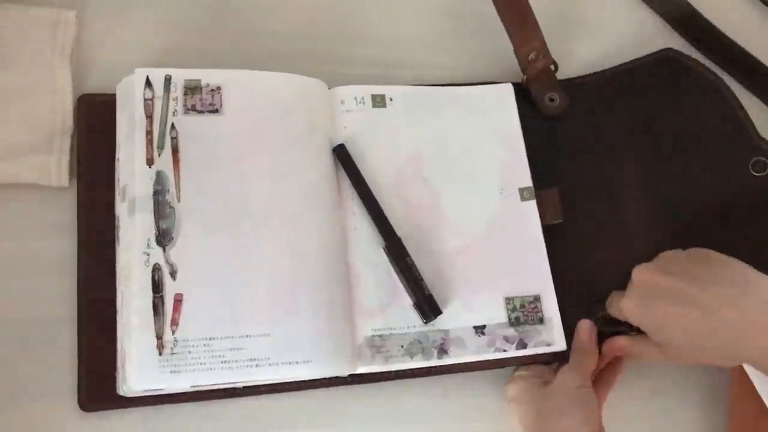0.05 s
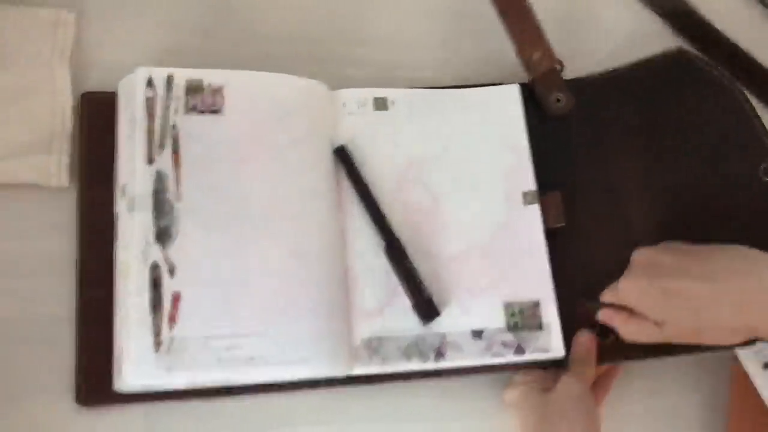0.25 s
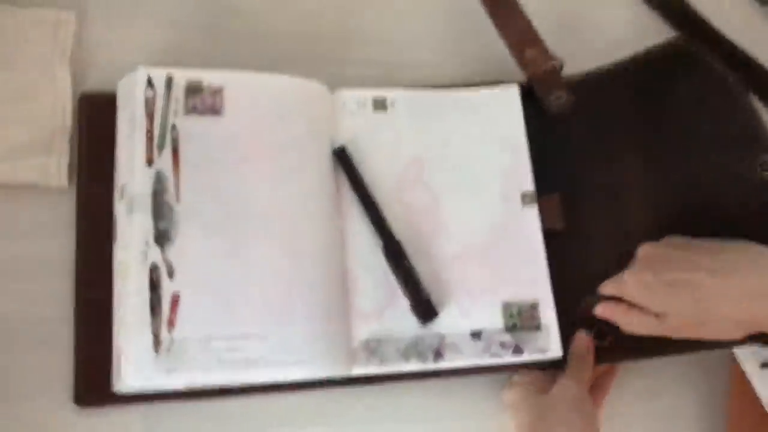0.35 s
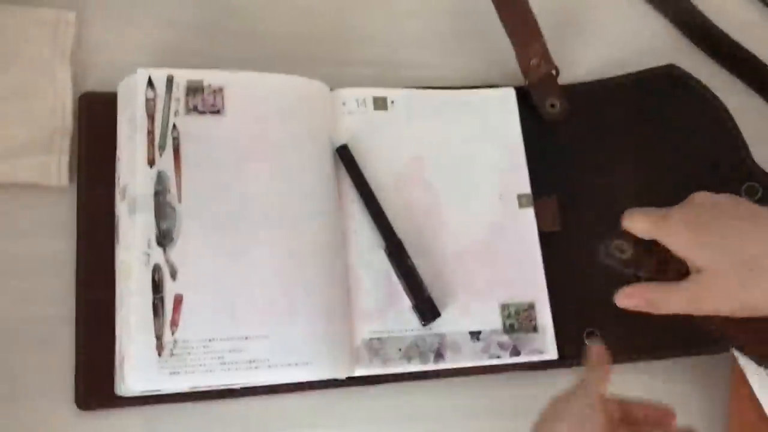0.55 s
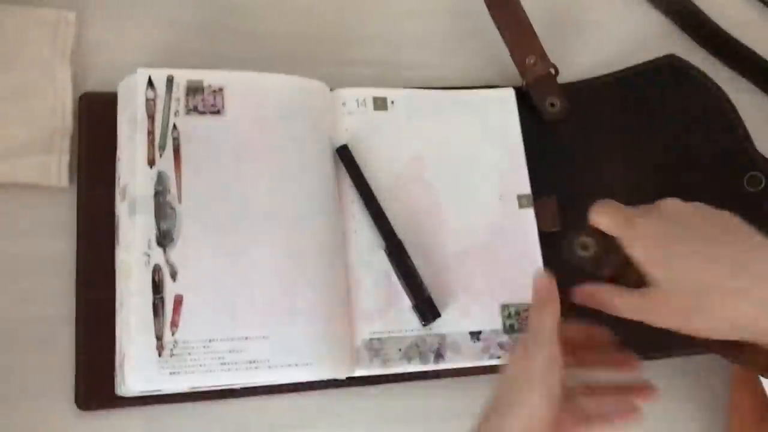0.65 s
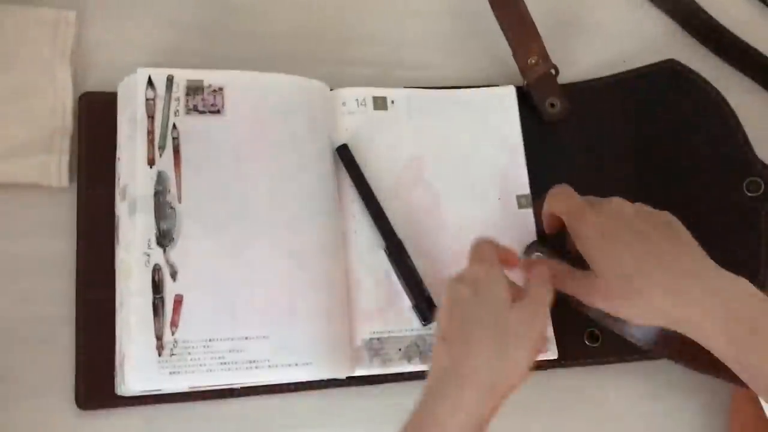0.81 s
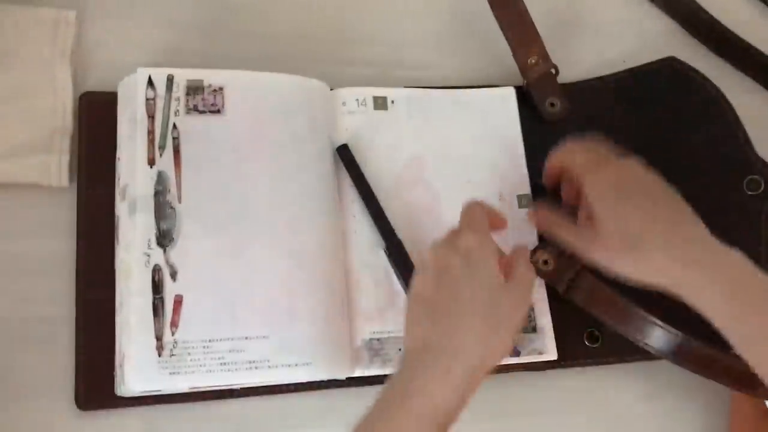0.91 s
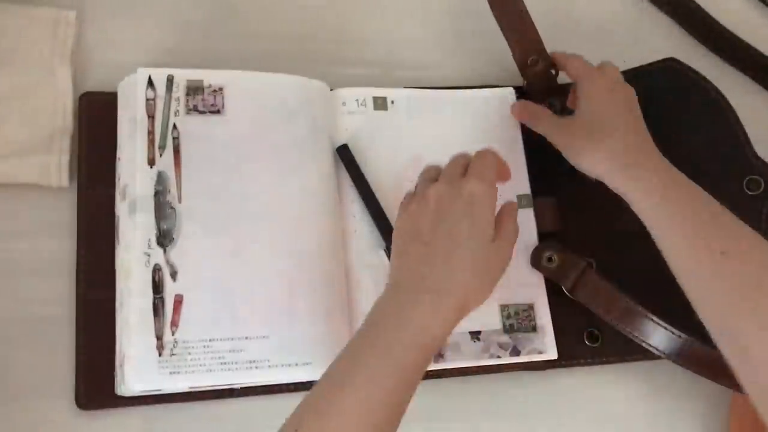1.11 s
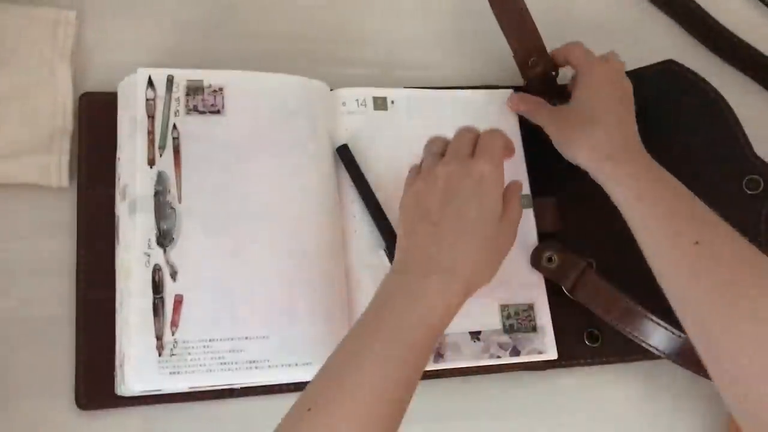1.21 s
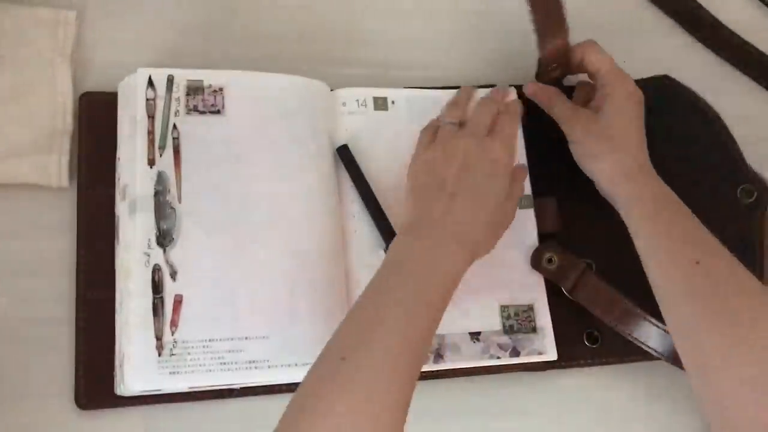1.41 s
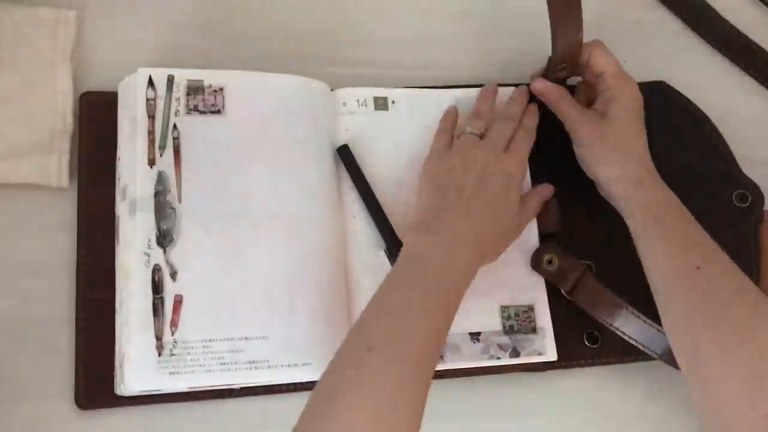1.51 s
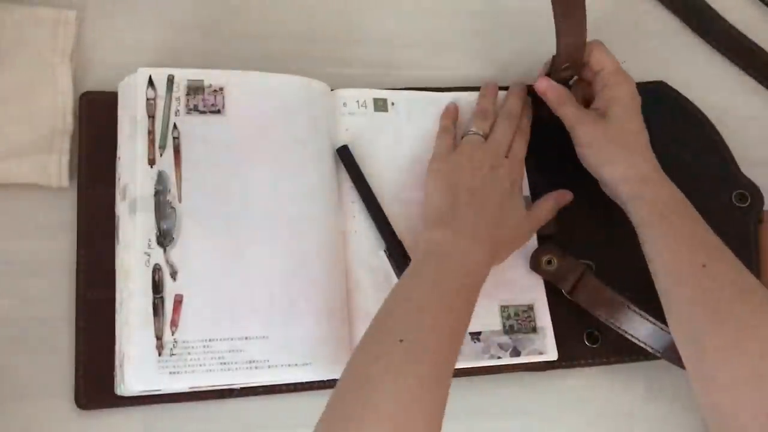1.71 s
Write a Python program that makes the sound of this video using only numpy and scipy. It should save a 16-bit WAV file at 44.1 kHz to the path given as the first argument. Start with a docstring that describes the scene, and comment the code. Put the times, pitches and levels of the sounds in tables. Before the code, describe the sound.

A metal snap fastener pops open at 0.22 seconds: a sharp, bright crackling click with a leather slap, low table thump and brief hiss. Soft rustling leads to a duller double slap around 0.54, then a knock at 0.66. Faint squeaks come near 0.85, a light tap at 0.93, near quiet, a small tap at 1.41, and tiny leather creaks from 1.5 to 1.7. Close, quiet room with steady soft hush.

```python
"""In a quiet room, close by, a metal snap fastener on a leather cover pops open on a table.
Filtered noise pulses and damped modes make the snap, dense grains its hissing tail and the later rustling
strokes; half-sine blows ring the table, and low tones thump. Noise bursts make the leather slaps and one
swelling rustle, uneven slips the creaks. Narrow-band grit squeaks and damped sines tinkle, over a steady hush."""
import sys
import numpy as np
from scipy import signal
from scipy.fft import rfft, irfft
from scipy.io import wavfile
from scipy.ndimage import uniform_filter1d

SR = 44100
rng = np.random.default_rng(int(sys.argv[2]) if len(sys.argv) > 2 else 0)


def to_wav(s):
    """Save 16-bit WAV."""
    ch = np.atleast_2d(s).T  # columns
    pcm = np.round(np.clip(ch, -1, 1) * 32767)  # PCM
    wavfile.write(sys.argv[1], SR, pcm.astype(np.int16))


N = 77175  # samples, 1.75 s

# Spectrum of the room hush. Each row: frequency in Hz, relative density in dB per Hz.
HUSH_SPECTRUM = [(12, -37), (20, -2), (101, -2.5), (209, -14), (300, -10.5), (482, -17), (570, -19),
                 (819, -21), (1470, -25.5), (1840, -29.5), (8090, -37.5), (14100, -41), (15800, -41.5)]
HUSH_DB = -61.5  # rms

# Leather slaps and taps, and one swelling mid-high rustle at .561 s. Each row: start in seconds,
# body rms before fading in dB, body centre in Hz, body width in octaves, edge relative to body in dB,
# edge centre in Hz, rise in seconds, t60 in seconds.
NOISE_BURSTS = [(.2225, -32, 1020, 0.44, 2, 4000, 0.0024, 0.053),
                (.256, -40, 700, 0.24, -2.5, 3490, .001, 0.054),
                (0.525, -50.5, 1510, 0.98, -1, 7000, 0.0011, .04),
                (0.538, -30, 1330, 0.91, -17, 4700, 0.0013, 0.033),
                (.545, -34, 1080, 0.68, -8.5, 5200, 0.0013, 0.063),
                (0.561, -56.5, 3830, 0.47, -19, 7000, 0.029, 0.37),
                (.588, -48, 1080, 0.62, -25, 4000, 0.0064, 0.065),
                (.655, -45.5, 820, 0.78, -25, 2500, 0.00081, 0.017),
                (0.817, -58, 2040, .4, -12, 4000, 0.00035, 0.036),
                (0.8398, -55, 2340, 0.76, -7, 8100, 0.00032, 0.027),
                (.929, -43, 960, 0.4, -26.5, 4000, 0.00068, 0.046),
                (0.933, -51.5, 1520, 1, -2, 8850, 0.00052, 0.062),
                (.939, -51, 1260, 1, 2.5, 7600, 0.00034, 0.064),
                (1.219, -58, 870, 0.54, -29.5, 3090, 0.0015, 0.037),
                (1.4094, -42, 1080, 0.36, -9, 4440, 0.00072, 0.045),
                (1.418, -48, 1000, 0.96, -25, 3960, 0.0013, 0.052),
                (1.429, -64, 2020, 0.42, 1, 6030, .0005, .01)]
EDGE_OCTAVES, EDGE_FADE_RATIO = 0.65, .7  # edge width; edge t60 relative to body t60
BURST_GRIT = 0.21  # rms of clicks relative to noise

# Chatter of the spring leaving the stud. Each row: start in seconds, pulse peak in dB before
# CRACK_DB and the filters.
SPRING_POPS = [(.2228, -26), (.2232, -10), (.2237, -14), (.2241, -10), (.2249, -18), (.2255, -15),
               (.2259, -11), (.2265, -18), (.2285, -19), (.2320, -22), (.2345, -24)]
POP_DECAY_S, CRACK_DB, STUD_DB = .00015, 3, -3.5
# Colour of the crack. Each row: frequency in Hz, relative density in dB per Hz.
CRACK_SPECTRUM = [(1290, -53), (2200, -24), (2870, -3), (3970, -4.5), (7100, -7.5), (7600, -19), (7940, -9),
                  (9260, -6.5), (10200, -13.5), (13100, -6.5), (16000, -32.5), (17000, -27)]
# Modes of stud and socket. Each row: frequency in Hz, relative level in dB, t60 in seconds.
STUD_MODES = [(3450, 19, 0.017), (4180, 3, 0.022), (7085, 2.5, 0.013), (9487, -6.5, 0.023),
              (13450, -11.5, .006)]

# Modes of table top and cover. Each row: frequency in Hz, relative level in dB, t60 in seconds.
TABLE_MODES = [(297.1, -6, .2), (361.4, -17.5, 0.36), (444, -1.5, 0.018), (530, -8, 0.083),
               (665.4, 2.5, .06), (801, -1.5, 0.064), (902, -6, 0.11), (1068, -14, .04)]
# Blows that ring the table. Each row: start in seconds, impulse (summed push) in dB,
# contact time in seconds.
TABLE_BLOWS = [(.2228, -26.5, 0.00091), (.2257, -25, 0.00033), (0.242, -26.5, 0.0028),
               (.257, -41.5, 0.00071), (0.656, -33, 0.00034), (.6575, -32, 0.0014), (0.661, -30, 0.0017),
               (.93, -35, 0.0014), (0.544, -38.5, 0.00051), (1.411, -45, 0.0022)]
# Low thumps of the table frame. Each row: start in seconds, level before the slow rise and decay in dB,
# frequency in Hz, t60 in seconds.
FRAME_THUMPS = [(0.231, -21, 69, 0.14), (0.283, -30, 65, 0.14), (.35, -36.5, 68.5, 0.096),
                (0.454, -40.5, 80.4, 0.24), (.535, -27, 96, 0.053), (.59, -43.5, 83, .15),
                (0.954, -38.5, 67, 0.11), (1.02, -46.5, 60.2, 0.19), (1.415, -51, 89, 0.57),
                (1.621, -53.5, 62.5, .2), (1.719, -51, 70.3, .2)]
THUMP_RISE_S = 0.0045

# Bright hissing tail of the snap (first row), then rustling strokes of strap and hands over leather and
# paper. Each row: start in seconds, rise in seconds, hold in seconds, fall in seconds,
# grain rms before shaping in dB, tilt in dB per octave.
HISS_AND_STROKES = [(0.224, 0.0028, 0.05, .05, -47, -1), (.29, 0.0069, 0.059, 0.15, -59.5, -2),
                    (0.404, 0.003, 0.041, 0.047, -60, 0.5), (.44, 0.035, 0.047, 0.0084, -58.5, 0),
                    (0.554, 0.0033, 0.055, 0.038, -56, -0.5), (0.634, 0.0058, 0.027, 0.097, -59.5, -1),
                    (0.751, 0.0025, 0.021, 0.09, -63.5, 0), (0.826, 0.043, 0.087, 0.012, -62, 1.5),
                    (0.942, 0.0045, 0.007, 0.078, -63, 0.5), (1.107, 0.0034, 0.0072, 0.013, -70.5, 8),
                    (1.232, 0.028, 0.059, 0.039, -71, 3.5), (1.442, 0.016, 0.14, .04, -70, 0.5),
                    (1.577, 0.02, 0.029, 0.054, -61.5, 0.5)]
# Colour of hiss and strokes before tilt. Each row: frequency in Hz, relative density in dB per Hz.
RUSTLE_SPECTRUM = [(180, -63), (300, -1.5), (927, -6.5), (1010, -5), (1270, -8.5), (3160, -13.5),
                   (4120, -13.5), (4870, -15.5), (11700, -21.5), (15800, -21.5)]
GRAINS_PER_S, GRAIN_SPREAD_DB = 15000, 2.5
UNEVEN_DB, UNEVEN_S = 1.3, .015  # rms level wander, and the averaging time that slows it

# Decay of the room. Each row: frequency in Hz, t60 in seconds.
ROOM_T60 = [(200, 0.1), (1000, 0.28), (4000, 0.19), (9000, 0.14), (16000, 0.033)]
ROOM_DB, SNAP_ROOM_DB = -11.5, -12  # room sends of bursts, creaks and small tones, and of the snap

# Thin tinkles of metal fittings. Each row: start in seconds, frequency in Hz,
# level before rise and decay in dB, t60 in seconds.
METAL_TINKLES = [(.271, 13600, -54, .02), (.548, 9450, -47, .03), (.562, 9450, -56, .04),
                 (.94, 13700, -64, .15), (1.0, 13700, -71, .12)]
# Squeaks of skin on leather. Each row: start in seconds, length in seconds, centre in Hz,
# rms before shaping in dB.
SKIN_SQUEAKS = [(.425, .020, 5700, -64), (.822, .012, 5800, -68), (.848, .028, 5800, -58),
                (.89, .025, 5600, -68)]
SQUEAK_WIDTH_HZ = 960  # two standard deviations of the band

# Creaks of leather. Each row: start in seconds, length in seconds (negative leaves only the first slip),
# rms of the first 1000 samples in dB.
LEATHER_CREAKS = [(1.504, -0.5, -58.5), (1.599, -0.65, -56.5), (1.624, .015, -56.5), (1.648, .03, -69),
                  (1.724, 0.014, -60.5)]
# Cover resonances. Each row: frequency in Hz, relative level in dB, t60 in seconds.
COVER_MODES = [(905, 0, .035), (1340, -4, .025), (1800, -6, .03), (2090, -9, .03), (2420, -6, .03),
               (3000, -14, .015), (4020, -14, .012)]
# Colour of the dry scuff. Each row: frequency in Hz, relative density in dB per Hz.
SCUFF_SPECTRUM = [(300, -40), (800, 0), (2500, -5), (5000, -16), (12000, -36)]
SLIPS_PER_S, SLIP_SPREAD_DB, SLIP_T60_S = 1500, 2.5, .08
SCUFF_DB, FIRST_SLIP = -7, 5.  # scuff relative to the resonances; amplitude of the first slip

BAND_EDGE_HZ = 17100


def gain_of(db):
    """Amplitude ratio of a level in dB."""
    return 10 ** (np.asarray(db) / 20)


def evened(x):
    """Normalisation to rms 1."""
    return x / np.sqrt(np.mean(x ** 2) + 1e-20)


def read(points, hz):
    """Interpolation of a table along logarithmic frequency."""
    f, value = np.transpose(points)
    return np.interp(np.log(hz + 1), np.log(f + 1), value)


def add(mix, s, sound):
    """Superposition: a sound joins the mix at s seconds."""
    part = mix[round(s * SR):][:len(sound)]
    part += sound[:len(part)]


def coloured(x, points):
    """Spectral shaping by a table, silent above its top, at rms 1."""
    hz = np.fft.rfftfreq(len(x), 1 / SR)
    gain = gain_of(read(points, hz)) * (hz <= points[-1][0])
    return evened(irfft(rfft(x) * gain, len(x)))


def causal(points):
    """Minimum-phase response of a spectrum table, from its log gain by Hilbert transform, energy 1."""
    hz = abs(np.fft.fftfreq(1024, 1 / SR))
    log_gain = np.log(gain_of(np.maximum(read(points, hz), -80)))
    phase = -signal.hilbert(log_gain).imag
    taps = np.fft.ifft(np.exp(log_gain + 1j * phase)).real[:512]
    return taps / np.linalg.norm(taps)


def bell(hz, centre_hz, octaves):
    """Gaussian spectral hump on a logarithmic frequency axis."""
    return np.exp(-.5 * (np.log2(hz / centre_hz) / octaves) ** 2)


def ring(modes, seconds):
    """Modal superposition: exponentially damped sines of alternating sign."""
    t = np.arange(0, seconds, 1 / SR)
    out = np.zeros(len(t))
    for k, (hz, db, t60) in enumerate(modes):
        out += (-1) ** k * gain_of(db - 60 * t / t60) * np.sin(2 * np.pi * hz * t)
    return out


def grit(size, per_s, spread_db):
    """Random impulse train: clicks of either sign with uneven size, at rms 1."""
    chance, sign, height = rng.random((3, size))
    clicks = (chance < per_s / SR) * np.sign(sign - .5)
    return evened(clicks * gain_of(-spread_db * np.log(height + 0.00064)))


def hush():
    """Stationary random noise: the steady background has a fixed spectrum."""
    return gain_of(HUSH_DB) * coloured(rng.standard_normal(N), HUSH_SPECTRUM)


def slaps_and_swell():
    """Shaped noise: a broad body and a faster-decaying edge; quick rises slap, one slow rise swells."""
    out, t = np.zeros(N), np.arange(8192) / SR
    hz = np.fft.rfftfreq(len(t), 1 / SR) + 1  # avoids log of zero
    for s, db, body_hz, octaves, edge_db, edge_hz, rise, t60 in NOISE_BURSTS:
        noise = rng.standard_normal(len(t)) + BURST_GRIT * grit(len(t), 1200, 4.)
        spectrum = rfft(noise) * (hz < 15800)
        body = evened(irfft(spectrum * bell(hz, body_hz, octaves)))
        edge = evened(irfft(spectrum * bell(hz, edge_hz, EDGE_OCTAVES)))
        fade_db = -60 * np.maximum(t - rise, 0) / t60
        burst = gain_of(db + fade_db) * body
        burst += gain_of(db + edge_db + fade_db / EDGE_FADE_RATIO) * edge
        add(out, s, np.minimum(t / rise, 1) * burst)
    return out


def snap():
    """Impulsive excitation: each tiny wide-band pop cracks and rings the metal modes a little."""
    drive, t = np.zeros(N), np.arange(128) / SR
    for s, db in SPRING_POPS:
        pop = rng.standard_normal(128) * np.exp(-t / POP_DECAY_S)
        add(drive, s, gain_of(db + CRACK_DB) * pop / abs(pop).max())
    stud = ring(STUD_MODES, 0.025)
    stud = stud / np.linalg.norm(stud)
    crack = signal.oaconvolve(drive, causal(CRACK_SPECTRUM))[:N]
    return crack + gain_of(STUD_DB) * signal.oaconvolve(drive, stud)[:N]


def table():
    """Forced vibration: half-sine contact pushes excite damped modes, beside slow-rising low thumps."""
    drive, out, t = np.zeros(N), np.zeros(N), np.arange(0, .4, 1 / SR)
    for s, db, contact in TABLE_BLOWS:
        push = np.sin(np.pi * np.clip(t[:200] / contact, 0, 1))
        add(drive, s, gain_of(db) * push / push.sum())
    for s, db, hz, t60 in FRAME_THUMPS:
        rise = np.exp(-t / THUMP_RISE_S) - 1  # inverted polarity
        add(out, s, rise * ring([(hz, db, t60)], .4)[:len(t)])
    return out + signal.oaconvolve(drive, ring(TABLE_MODES, .4) / 2)[:N]


def hiss_and_rustle():
    """Granular noise: dense random grains rise, hold and fall, as the snap's hissing tail and as strokes."""
    out, size = np.zeros(N), 12000
    for s, rise, hold, fall, db, tilt_db in HISS_AND_STROKES:
        colour = [(hz, level + tilt_db * np.log2(hz / 3000)) for hz, level in RUSTLE_SPECTRUM]
        corners = np.cumsum([0, rise, hold, fall])
        shape = np.interp(np.arange(size) / SR, corners, [0, 1, 1, 0])
        wander = evened(uniform_filter1d(rng.standard_normal(size), int(UNEVEN_S * SR)))
        shape *= gain_of(UNEVEN_DB * wander)
        grains = coloured(grit(size, GRAINS_PER_S, GRAIN_SPREAD_DB), colour)
        add(out, s, gain_of(db) * shape * grains)
    return out


def room(x):
    """Reverberation: convolution with a noise tail whose bands decay at their own rates."""
    hz, t, bands = signal.stft(rng.standard_normal(SR // 2), SR, nperseg=128)
    decay = gain_of(-60 * t / read(ROOM_T60, hz)[:, None])
    tail = signal.istft(bands * decay, SR, nperseg=128)[1]
    tail = np.concatenate([np.zeros(100), tail])  # delay in samples before the tail
    return signal.fftconvolve(x, tail / np.linalg.norm(tail))[:N]


def tinkles():
    """Free vibration: each metal fitting sounds one damped sine with a brief rise."""
    out = np.zeros(N)
    for s, hz, db, t60 in METAL_TINKLES:
        tone = ring([(hz, db, t60)], .25)
        add(out, s, tone * np.minimum(np.arange(len(tone)) / SR / 0.0018, 1))
    return out


def squeaks():
    """Narrow-band excitation: random clicks through a Gaussian band give a fuzzy pitch."""
    out, t = np.zeros(N), np.arange(4096) / SR
    f = np.fft.rfftfreq(len(t), 1 / SR)
    for s, length, hz, db in SKIN_SQUEAKS:
        band = np.exp(-.5 * ((f - hz) / (SQUEAK_WIDTH_HZ / 2)) ** 2)
        fuzz = evened(irfft(rfft(grit(len(t), 3000, 2.5)) * band))
        shape = np.sin(np.pi * np.clip(t / length, 0, 1)) ** .5
        add(out, s, gain_of(db) * fuzz * shape)
    return out


def creaks():
    """Stick-slip: uneven slips excite the cover resonances and a dry scuff."""
    out, t = np.zeros(N), np.arange(4096) / SR
    body = ring(COVER_MODES, .05)
    body = body / np.linalg.norm(body)
    body[:512] += gain_of(SCUFF_DB) * causal(SCUFF_SPECTRUM)
    for s, length, db in LEATHER_CREAKS:
        slips = grit(len(t), SLIPS_PER_S, SLIP_SPREAD_DB) * gain_of(-60 * t / SLIP_T60_S)
        slips *= np.clip((length - t) / 0.0027, 0, 1)  # short closing ramp
        slips[0] = FIRST_SLIP
        sound = signal.oaconvolve(slips, body)
        add(out, s, gain_of(db) * sound / np.sqrt(np.mean(sound[:1000] ** 2)))
    return out


def scene():
    """Superposition of direct sources, reverberation and hush; table, hiss and strokes stay dry."""
    pop = snap()
    near = slaps_and_swell() + creaks() + squeaks() + tinkles()
    wet = room(gain_of(SNAP_ROOM_DB) * pop + gain_of(ROOM_DB) * near)
    return (pop + near + table() + wet + hiss_and_rustle() + hush())[None]


def record(dry):
    """Band limitation: a linear-phase low-pass filter removes the top of the spectrum."""
    low_pass = signal.firwin(511, BAND_EDGE_HZ, window=("kaiser", 9), fs=SR)
    return signal.oaconvolve(dry, low_pass[None], "same")


dry = scene()
out = record(dry)
to_wav(out)
```